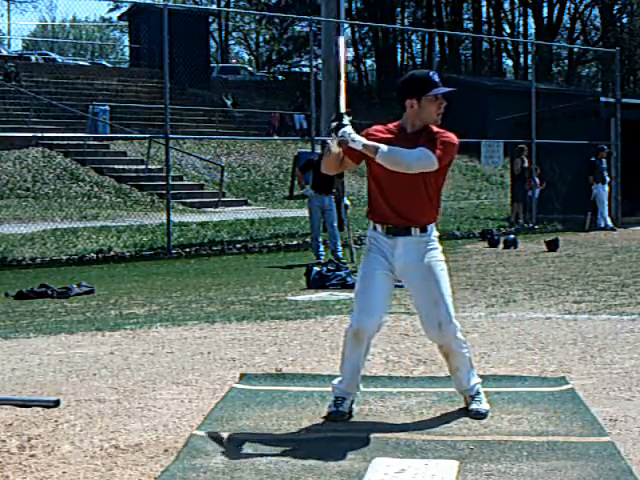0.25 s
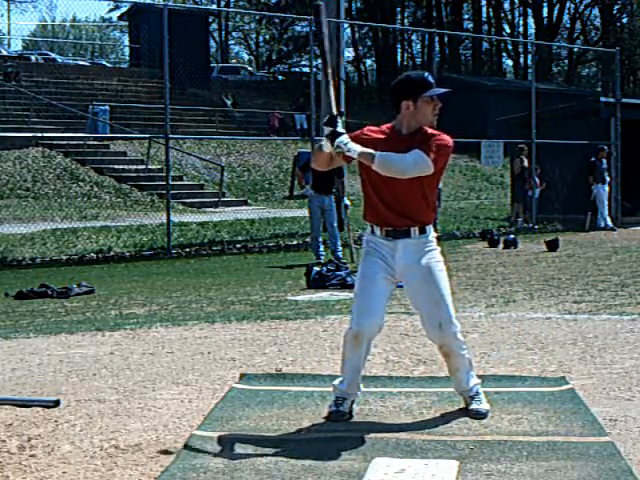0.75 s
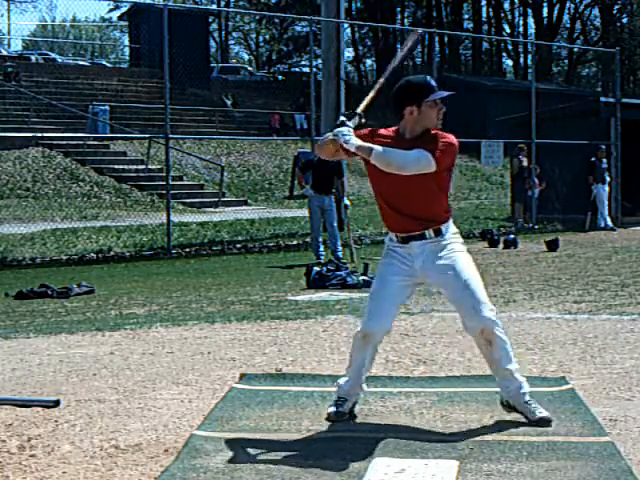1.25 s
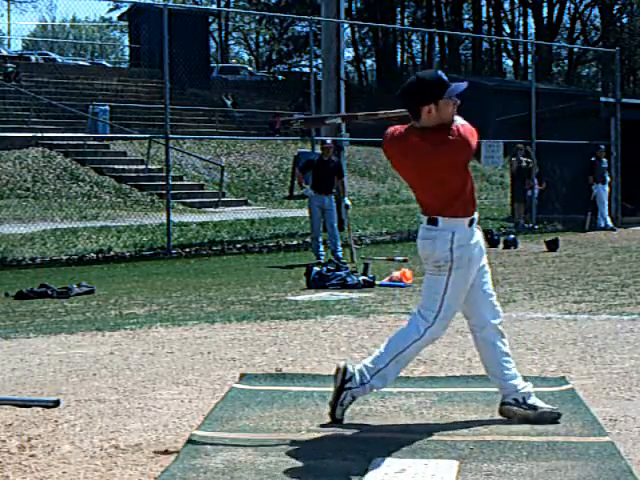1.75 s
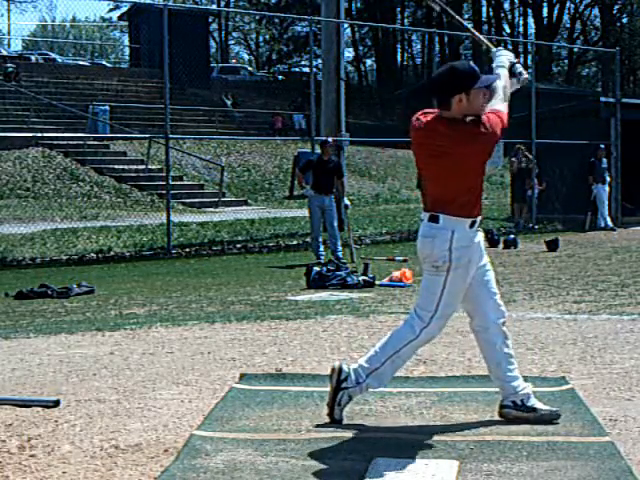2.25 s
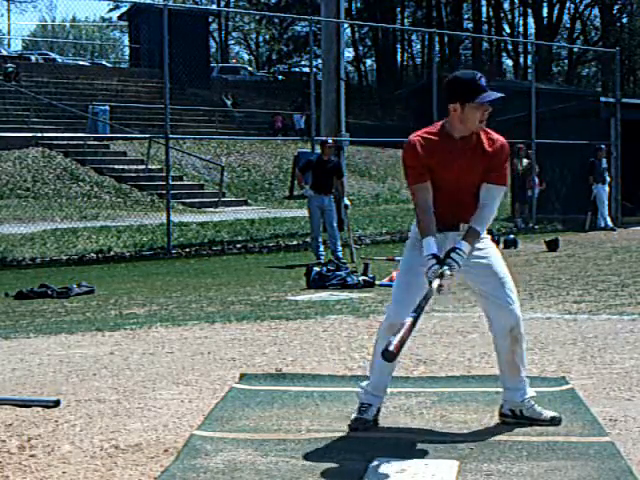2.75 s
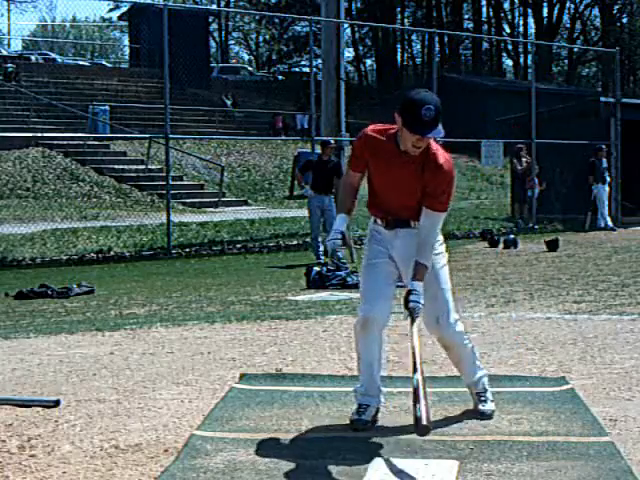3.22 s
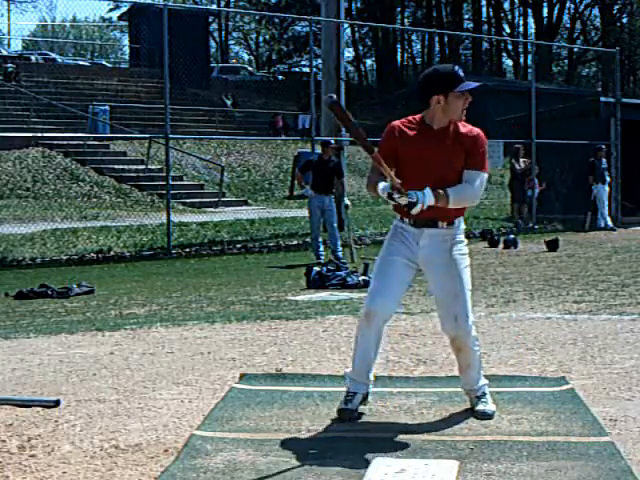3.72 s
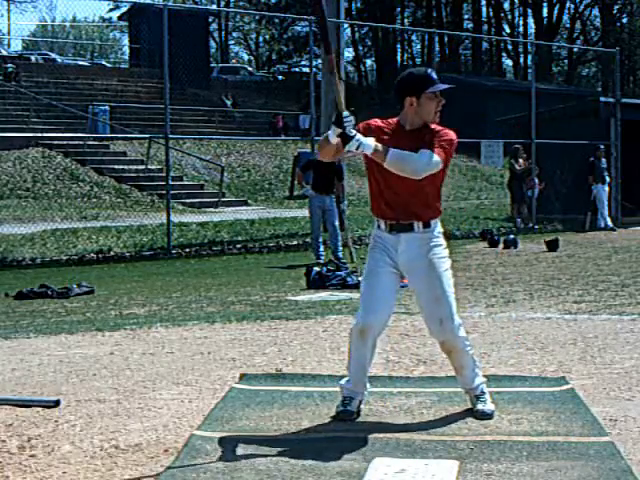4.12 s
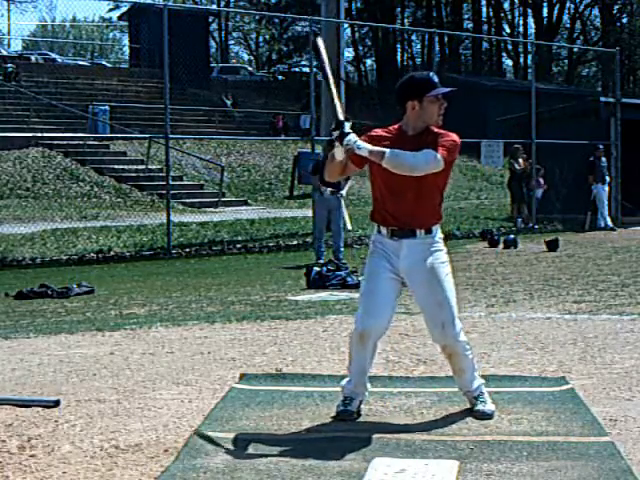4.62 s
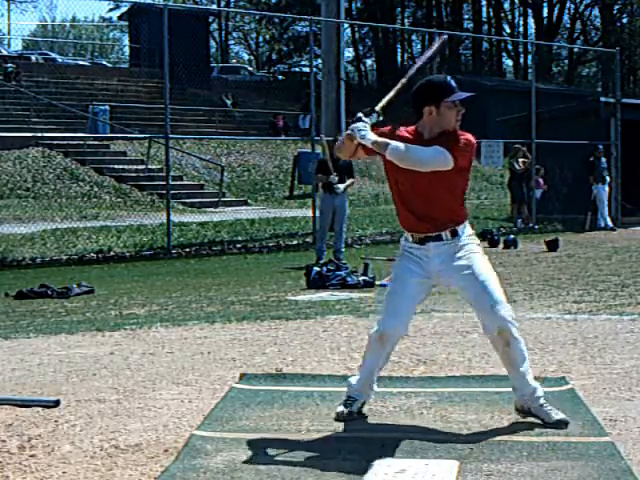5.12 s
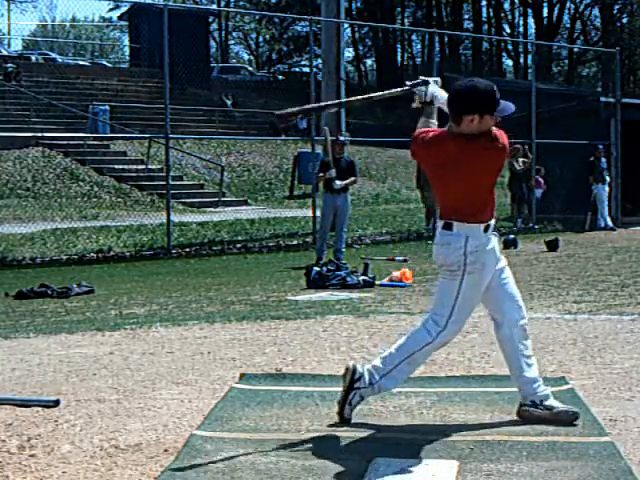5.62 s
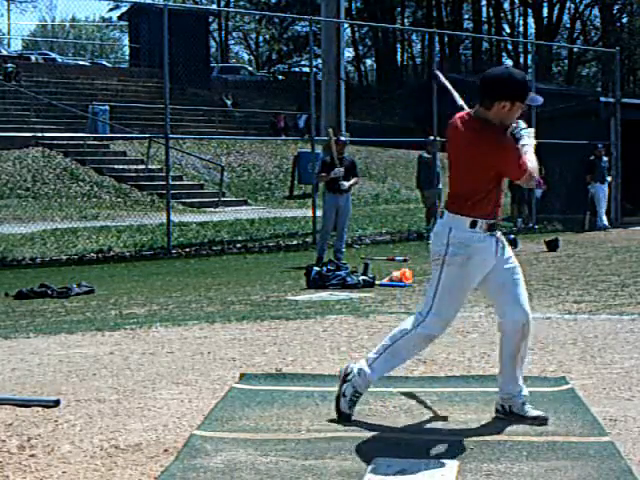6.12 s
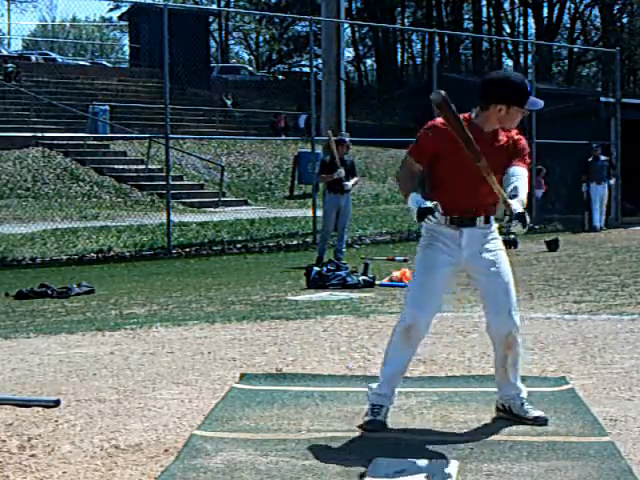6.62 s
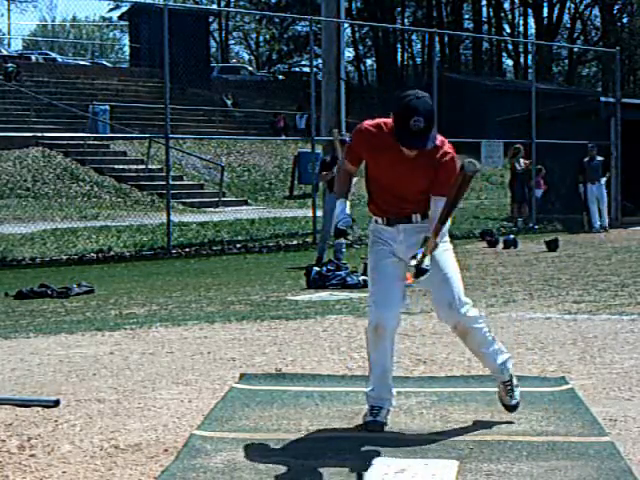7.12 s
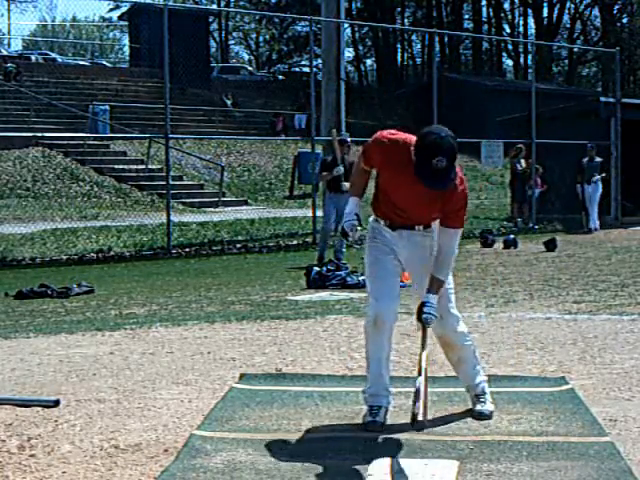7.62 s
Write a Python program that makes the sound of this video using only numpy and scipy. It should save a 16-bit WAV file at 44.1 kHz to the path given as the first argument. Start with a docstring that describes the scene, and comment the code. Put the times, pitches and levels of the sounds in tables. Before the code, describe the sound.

An open baseball field heard through one cheap, hissy mono microphone. From 0 s a distant jet rumbles and roars, fluttering in uneven swells, its hollow colour slowly sinking along with two faint wavering tones in the middle-low range. Tiny bird chirps appear at about 0.3 to 0.9 s. At 1.8 s a wooden bat cracks a ball: extremely loud, snappy, very short and clipped, with rapid clacking echoes within a fifth of a second and a faint grainy tail. Roar returns, stronger around 2 to 4 s, with brief chirps at 2.3, 2.6 and 3.7 s and sparse dry grit ticks. Low wind bumps thud softly near 5.2 and 5.5 s. At 5.6 s comes the second crack, less piercing and woodier, echoing likewise. Two low faint chirps follow near 6 s, then wind buffets at 6.6 and 7.2 s, small ticks and continuing rumble until the end at about 7.9 s.

```python
"""A wooden bat cracks twice at batting practice on an open field: damped rings and a noise snap, echoed all around.
A distant aircraft rumbles past as coloured noise with its ground reflection, under two slowly sinking tones.
Wind nudges the microphone as low noise, small birds chirp as gliding sines, and grit ticks underfoot as noise bursts.
Over a soft hiss, the input overloads on the hits and holds each sample at a low rate, which adds a fizzy top."""
import sys
import numpy as np
from scipy import signal
from scipy.fft import rfft, irfft, next_fast_len
from scipy.io import wavfile
from scipy.ndimage import map_coordinates

SR = 44100
rng = np.random.default_rng(int(sys.argv[2]) if len(sys.argv) > 2 else 0)


def inscribe(sig):
    """Save sig as 16-bit PCM at rate SR to the path in sys.argv[1].

    A 1-D sig is mono; a 2-D sig holds one channel per row.
    Samples are clipped to [-1, 1] before scaling.
    """
    pcm = np.round(np.clip(np.atleast_2d(sig).T, -1, 1) * 32767)
    wavfile.write(sys.argv[1], SR, pcm.astype(np.int16))


N = 346442
TIME = np.arange(N) / SR  # seconds

# The wood's ringing modes, which differ with the point of contact. Each row: pitch in Hz, t60 in seconds,
# level on the first hit and level on the second, both in dB against the peak of the pock.
WOOD_MODES = [(707, 0.02, -5.5, -40), (911, 0.022, -12.5, -8.5), (1071, 0.033, -8.5, -11),
              (2330, 0.027, -22, -46), (2620, 0.032, -18, -18), (2940, 0.013, -41, -9.5),
              (3800, 0.02, -33, -9.5), (4610, 0.027, -19.5, -26)]
# The aircraft swelling and fading in the moving air. Each row: time in seconds, roar in dB, rush in dB.
AIRCRAFT_SWELL = [(0.0, -26.0, -35), (0.18, -22.5, -30.5), (0.28, -30, -32), (0.82, -32.0, -35),
                  (1.5, -26.5, -33.5), (1.72, -36.5, -37), (2.14, -22.0, -27.5), (2.98, -21.5, -26.5),
                  (3.26, -17, -21.5), (3.54, -29.5, -32), (3.88, -21, -21.0), (4.08, -31.5, -29.5),
                  (4.32, -23.5, -26.5), (4.5, -24.0, -26), (5.1, -30, -32), (5.26, -21, -27.5),
                  (5.5, -26, -28.0), (5.7, -19.5, -20.0), (5.96, -27.5, -29.5), (6.14, -20.5, -26.5),
                  (6.46, -28, -30), (6.64, -23.5, -22.0), (6.74, -27.5, -29), (7.44, -27.5, -28),
                  (7.72, -21, -21), (7.84, -23, -26)]


def from_db(db):
    """Decibels to gain."""
    return 10 ** (np.asarray(db) / 20)


def rms_one(x):
    """Scale to unit rms."""
    return x / np.sqrt(np.mean(x ** 2) + 1e-20)


def in_time(rows):
    """Draw each column of a curve at every sample; the first column is time in seconds."""
    seconds, *columns = np.transpose(rows)
    return [np.interp(TIME, seconds, column) for column in columns]


def butter(x, hz, kind, order=2):
    """Causal Butterworth filter."""
    edges = np.clip(hz, 10, .45 * SR)
    sections = signal.butter(order, edges, kind, fs=SR, output="sos")
    return signal.sosfilt(sections, x + 1e-18)


def shaped(x, spectrum):
    """Colour a noise by (Hz, dB) points, with nothing from an octave above the last point."""
    hz, db = np.transpose(spectrum)
    size = next_fast_len(N)
    bins = np.maximum(np.fft.rfftfreq(size, 1 / SR), 1)
    gain = from_db(np.interp(np.log(bins), np.log(hz), db)) * (bins < 2 * hz[-1])
    return irfft(rfft(x, size) * gain, size)[:N]


def drift(rate):
    """Smooth random wander with a spread of about 1, through `rate` random points per second."""
    knots = rng.standard_normal(size=4096)
    return map_coordinates(knots, [TIME * rate], order=2, mode="wrap")


def ring(x, hz, t60):
    """Damped resonance: a unit click sets a sine of height 1 ringing."""
    radius = from_db(-60 / (t60 * SR))
    angle = 2 * np.pi * hz / SR
    return signal.lfilter([0, np.sin(angle)], [1, -2 * radius * np.cos(angle), radius ** 2], x + 1e-18)


def burst(t60, size):
    """Noise that dies away by 60 dB in t60 seconds."""
    return rng.standard_normal(size) * from_db(-60 * np.arange(size) / SR / t60)


def add(out, seconds, x):
    """Mix a short sound in at a given time."""
    start = int(round(seconds * SR))
    out[start:start + len(x)] += x[:N - start]


def bat():
    """Each crack arrives directly, off the nearby ground and cage, then thinner from the far structures."""
    # Bat on ball. Each row: start in seconds, level in dB, pitch of the pock in Hz,
    # snap towards the microphone and snap towards the field, both in dB on top of the level.
    hits = [(1.7951, 17, 790, -3.5, -13.5), (5.6353, 6.5, 940, -27, -6.5)]
    # Ground and cage close by. Each row: delay in seconds, level in dB.
    near_echoes = [(.0022, -11.5), (.0054, -4.5), (0.0118, -23)]
    # Fences, dugout and stands. Each row: delay in seconds, level in dB, scattered share in dB on top of it.
    far_echoes = [(0.035, -29, -4), (0.0433, -22, 2), (0.056, -32, 14), (0.0638, -10.5, -2),
                  (0.0708, -16.5, 5.5), (.088, -42, 4), (0.1249, -20, -3), (0.1592, -20.5, -2)]
    out = np.zeros(N)
    levels_per_hit = np.transpose(WOOD_MODES)[2:]
    for (start, level_db, pock_hz, near_snap_db, far_snap_db), mode_dbs in zip(hits, levels_per_hit):
        pock, snap, wood = from_db(level_db) * np.array(crack(pock_hz, mode_dbs))
        impact = pock + from_db(near_snap_db) * snap
        add(out, start, impact + wood)
        for delay, db in near_echoes:
            add(out, start + delay, from_db(db) * impact)
        # narrow boards and rails return little bass, so the pock comes back as a clack
        clack = butter(pock, [1130, 2000], "band")
        clack = clack + from_db(far_snap_db) * snap + from_db(-17.5) * wood
        for delay, db, scatter_db in far_echoes:
            add(out, start + delay, from_db(db) * clack)
            # steps and posts smear a part of each echo
            add(out, start + delay, from_db(db + scatter_db) * scattered(clack, t60=0.021, size=2048))
        # the trees return a faint, grainy wash
        add(out, start + 0.022, from_db(-14.5) * scattered(clack, t60=0.74, size=32768))
    return out


def crack(pock_hz, mode_dbs):
    """The squashed ball gives a pock of a few cycles and a bright snap; the wood rings briefly after it."""
    click = signal.unit_impulse(4096)
    pock = ring(ring(click, pock_hz, t60=0.0087), 1546, t60=0.0043)
    snap = butter(burst(t60=.008, size=4096), [1900, 4800], "band")
    wood = sum(from_db(db) * ring(click, hz, t60) for (hz, t60, *_), db in zip(WOOD_MODES, mode_dbs))
    return pock / np.abs(pock).max(), snap, wood


def scattered(x, t60, size):
    """Many small, uneven reflections that die away, with as much energy together as one full echo."""
    paths_per_s = 5000
    paths = burst(t60, size) * (rng.random(size) < paths_per_s / SR)
    return signal.fftconvolve(x, paths / np.sqrt(np.sum(paths ** 2) + 1e-20))


def aircraft():
    """Jet noise and its ground reflection cancel in notches that sink as the lag grows."""
    # Jet noise before it meets the ground. Each row: frequency in Hz, relative density in dB.
    jet_spectrum = [(15, -19), (40, -4), (90, 1.5), (140, 1), (210, 1.5), (300, -2.5), (500, -2), (750, -3),
                    (1050, -0.5), (1400, -8.5), (1800, -23.5), (2100, -31), (2600, -36)]
    # Level of the low rumble. Each row: time in seconds, level in dB.
    rumble_curve = [(0, -27.5), (.8, -25.5), (.92, -35), (1.1, -25.5), (1.7, -28), (3.35, -20.5),
                    (3.7, -25.5), (4.8, -26.5), (5.55, -19), (6.05, -24.5), (6.6, -19), (7.86, -22.5)]
    # the lag of the reflection eases from its first value towards its last
    lag_start_ms, lag_end_ms, lag_settle_s = 1.205, 2.44, 4.28
    roar_db, rush_db = in_time(AIRCRAFT_SWELL)
    rumble_db, = in_time(rumble_curve)
    lag_ms = lag_end_ms + (lag_start_ms - lag_end_ms) * np.exp(-TIME / lag_settle_s)
    jet = shaped(rng.standard_normal(N), jet_spectrum)
    reflected = np.interp(TIME - lag_ms / 1000, TIME, jet)
    # grass returns the lows best
    heard = jet + shaped(reflected, [(100, -1.0), (400, -6.0), (900, -8.0), (2000, -28)])
    rumble = rms_one(butter(heard, 249, "low", order=5))
    roar = butter(heard, 282, "high", order=5)
    roar = rms_one(butter(roar, 864, "low", order=6))
    rush = rms_one(butter(heard, 838, "high", order=6))
    # the strongest swells are also the brightest
    bright = rms_one(butter(rng.standard_normal(N), [1400, 1900], "band", order=4))
    bright = from_db(-20 + 0.28 * (rush_db - rush_db.mean())) * bright
    # turbulence on the way makes the higher bands flutter faster
    out = from_db(rumble_db + 1.3 * drift(12)) * rumble
    out += from_db(roar_db + 1.24 * drift(24)) * roar
    return out + from_db(rush_db + 1.24 * drift(30)) * (rush + bright)


def engine_tones():
    """Doppler shift: two wavering tones sink together as the aircraft recedes and the wavelength grows."""
    # Levels of the two tones. Each row: time in seconds, upper in dB, lower in dB.
    tone_curve = [(0, -34.5, -43), (1.7, -36, -41.5), (2.2, -25.5, -42), (3, -30.5, -22), (3.9, -34.5, -46),
                  (4.35, -27.5, -38), (5.55, -26.5, -45), (6.3, -41, -36), (7.86, -36, -30)]
    start_hz, stretch_per_s, lower_ratio = 491.7, .0256, .873
    tone_hz = start_hz / (1 + stretch_per_s * TIME)
    out = np.zeros(N)
    for ratio, db in zip([1, lower_ratio], in_time(tone_curve)):
        wavering_hz = ratio * tone_hz * (1 + 0.0031 * drift(10))
        phase = 2 * np.pi * np.cumsum(wavering_hz) / SR
        out += from_db(db + 2.1 * drift(9)) * np.sin(phase)
    return out


def wind():
    """A breeze brushes the microphone, brighter as it grows, with a few soft low bumps."""
    # Strength of the breeze. Each row: time in seconds, level in dB.
    breeze_curve = [(0, -39), (1, -32), (2.4, -39), (5, -43), (5.4, -32), (6.3, -34), (6.8, -28.5),
                    (7.3, -27.5), (7.86, -31)]
    # Single buffets. Each row: centre in seconds, level in dB, bell width (one sigma) in seconds, top in Hz.
    buffets = [(5.214, -17, 0.025, 170), (5.253, -10, 0.012, 206), (5.46, -13, 0.0062, 78.5),
               (6.604, -14.5, 0.023, 215), (7.19, -19, 0.023, 240)]
    # gusts reach higher than the breeze and grow faster; their level is that at the breeze's peak
    breeze_top_hz, gust_top_hz = 66.3, 395
    gust_peak_db, gust_growth = -25, 2.5  # growth in dB per dB of breeze
    breeze_db, = in_time(breeze_curve)
    out = from_db(breeze_db + 1.2 * drift(14)) * eddies(breeze_top_hz)
    gust_db = gust_peak_db + gust_growth * (breeze_db - breeze_db.max())
    out += from_db(gust_db) * eddies(gust_top_hz)
    for centre, db, width, top_hz in buffets:
        bell = np.exp(-.5 * ((TIME - centre) / width) ** 2)
        out += from_db(db) * bell * eddies(top_hz)
    return out


def eddies(top_hz):
    """Low turbulent noise of unit rms."""
    return rms_one(butter(rng.standard_normal(N), [22, top_hz], "band", order=3))


def birds():
    """Short whistles: gliding sines with a wavering pitch under a bell-shaped envelope."""
    # Each row: centre in seconds, level in dB, bell width (one sigma) in seconds, pitch in Hz,
    # glide in Hz per second.
    chirps = [(0.334, -52, 0.017, 5400, 3), (0.403, -46, 0.018, 4050, 1500), (.72, -46.5, 0.018, 4030, 304),
              (.94, -56, 0.061, 3500, -500), (2.257, -45, .02, 4830, -1000), (2.56, -45, 0.026, 2560, 0),
              (3.7, -50.5, 0.067, 4030, -500), (5.905, -46, 0.03, 2490, 0), (6.097, -48, 0.04, 2380, -3)]
    out = np.zeros(N)
    waver_hz = 15 * drift(48) + 35 * drift(400)
    for centre, db, width, hz, glide in chirps:
        near = np.abs(TIME - centre) < 4 * width
        t = TIME[near] - centre
        phase = 2 * np.pi * np.cumsum(hz + glide * t + waver_hz[near]) / SR
        out[near] += from_db(db) * np.exp(-.5 * (t / width) ** 2) * np.sin(phase)
    return out


def grit():
    """Tiny dry ticks as the batter shifts his feet: noise bursts through a band filter."""
    # The clearest ticks. Each row: start in seconds, level in dB ahead of the band filter.
    clear_ticks = [(1.827, -11), (1.8307, -17), (2.1204, -21), (4.153, -27), (4.2346, -25), (4.9172, -24.5),
                   (6.553, -27), (7.1075, -26), (7.2906, -26.5)]
    # fainter ticks come at random once the batter has swung, also levelled ahead of the filter
    from_s, ticks_per_s, faint_db, spread_db = 2.5, 2.5, -32.5, 2.2
    out = np.zeros(N)
    faint_times = TIME[(rng.random(N) < ticks_per_s / SR) & (TIME > from_s)]
    faint_ticks = [(start, rng.normal(faint_db, spread_db)) for start in faint_times]
    for start, db in clear_ticks + faint_ticks:
        add(out, start, from_db(db) * burst(t60=0.014, size=1024))
    return butter(out, [1700, 5400], "band")


def hiss():
    """Low-passed noise under everything rises and falls a little with the aircraft."""
    mean_db, follow_share = -49, 0.46  # share of the aircraft's swing in dB
    swell_db = np.mean(in_time(AIRCRAFT_SWELL), axis=0)
    level_db = mean_db + follow_share * (swell_db - swell_db.mean())
    return from_db(level_db) * rms_one(butter(rng.standard_normal(N), 5730, "low", order=8))


def scene():
    """Everything at one microphone."""
    mix = bat() + aircraft() + engine_tones() + wind() + birds() + grit() + hiss()
    return mix[None, :]


def record(dry):
    """The input clips; holding every fourth sample folds the sound into mirror images, cut off at the top."""
    clipped = np.clip(dry, -.97, .97)
    held = np.repeat(clipped[:, ::4], 4, axis=1)[:, :N]
    softened = butter(held, 19845, "low", order=1)
    # steep cutoff: order 10, 0.1 dB ripple, 80 dB rejection, edge at 15850 Hz
    cutoff = signal.ellip(10, .1, 80, 15850, fs=SR, output="sos")
    return signal.sosfilt(cutoff, softened)


dry = scene()
out = record(dry)
inscribe(out)
```